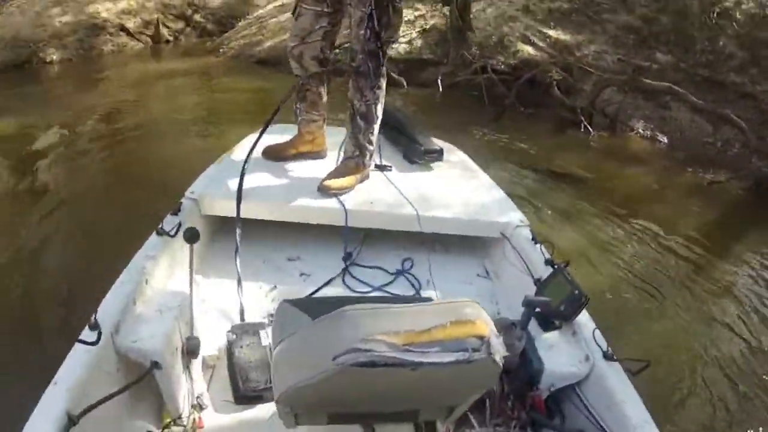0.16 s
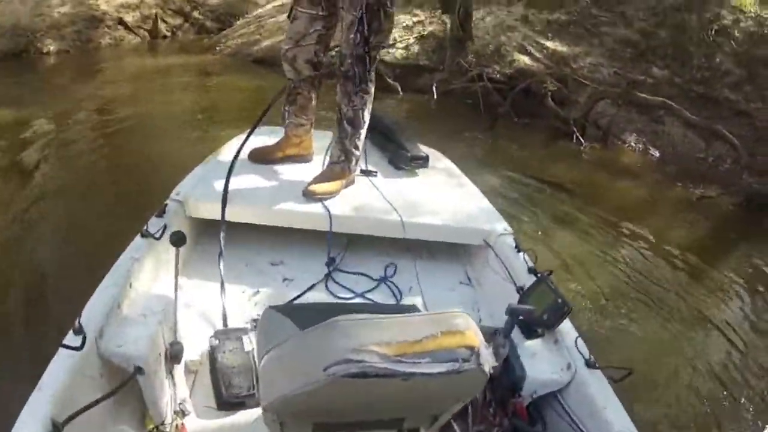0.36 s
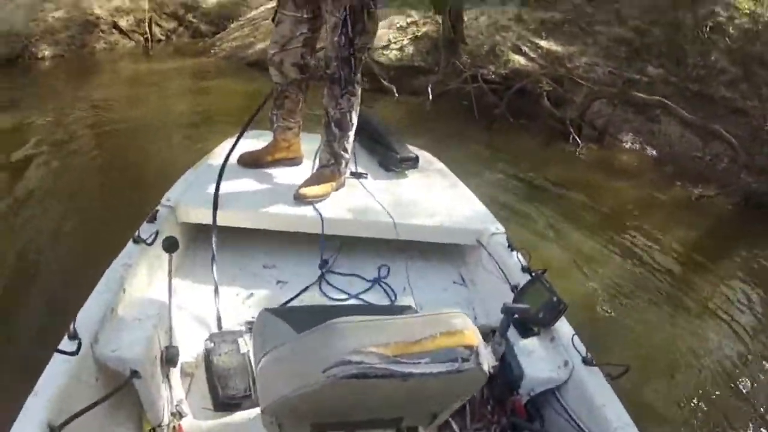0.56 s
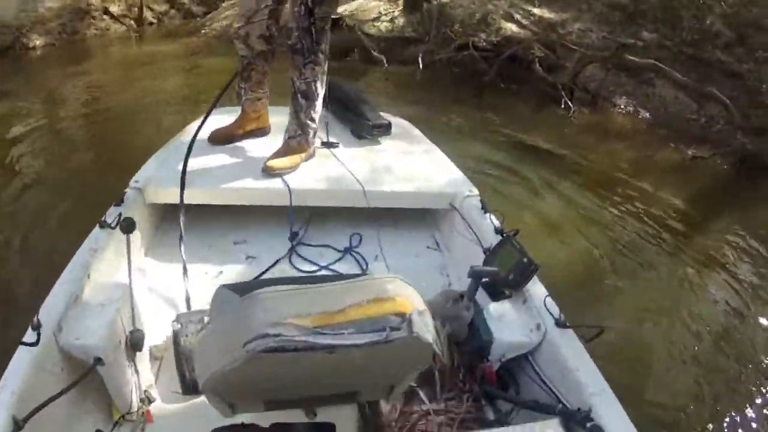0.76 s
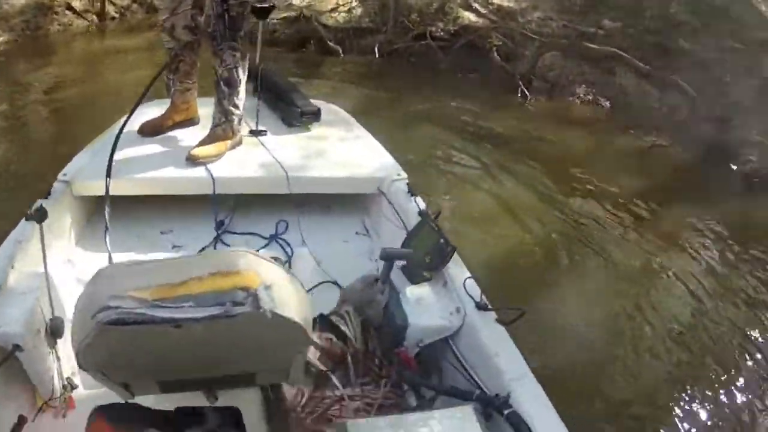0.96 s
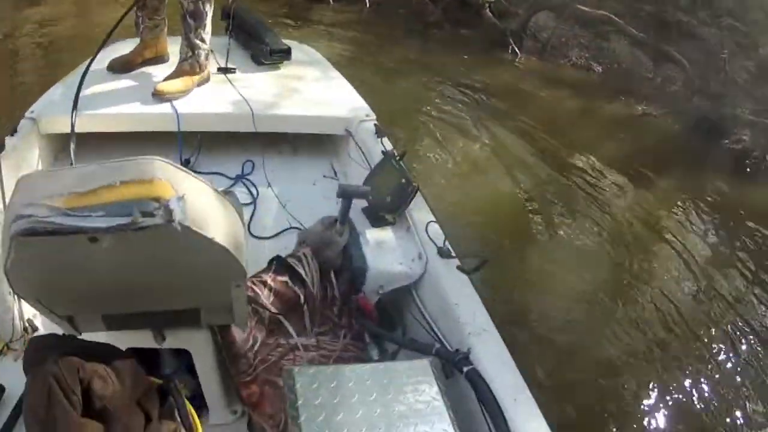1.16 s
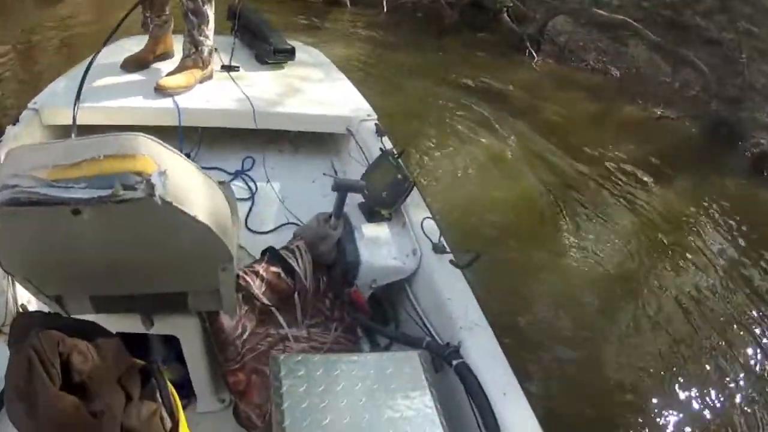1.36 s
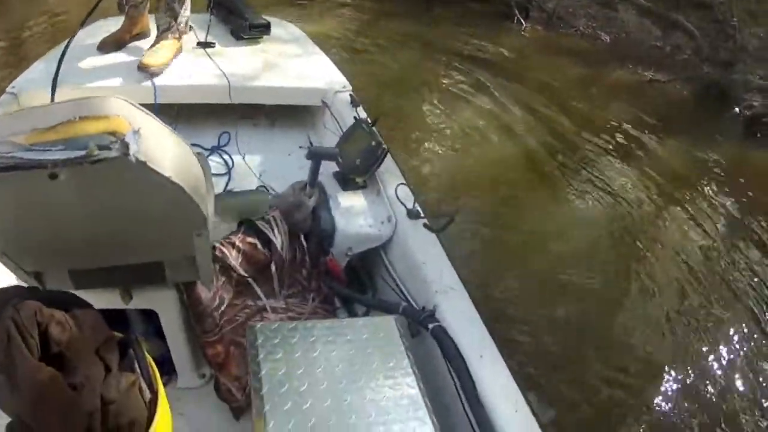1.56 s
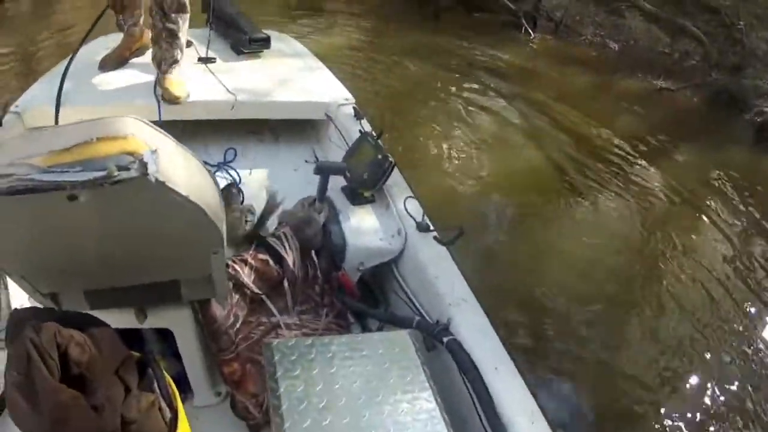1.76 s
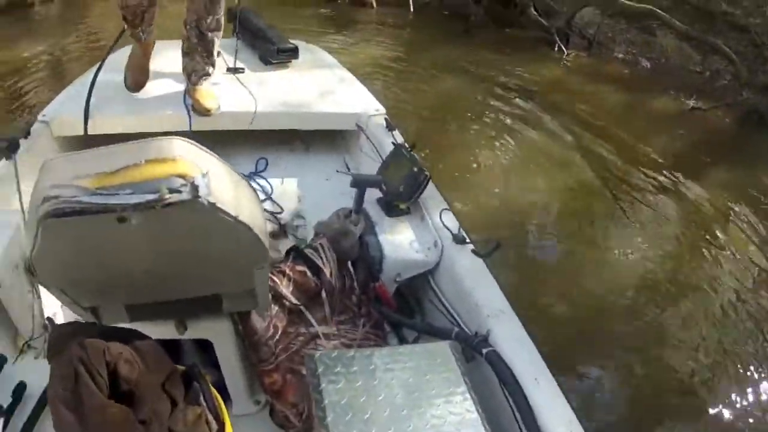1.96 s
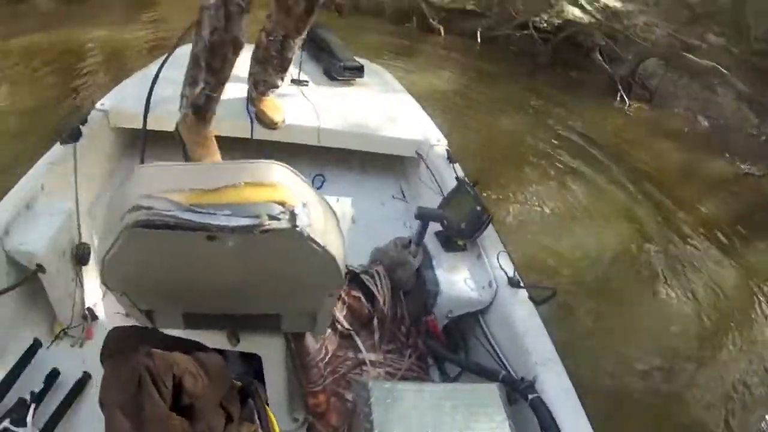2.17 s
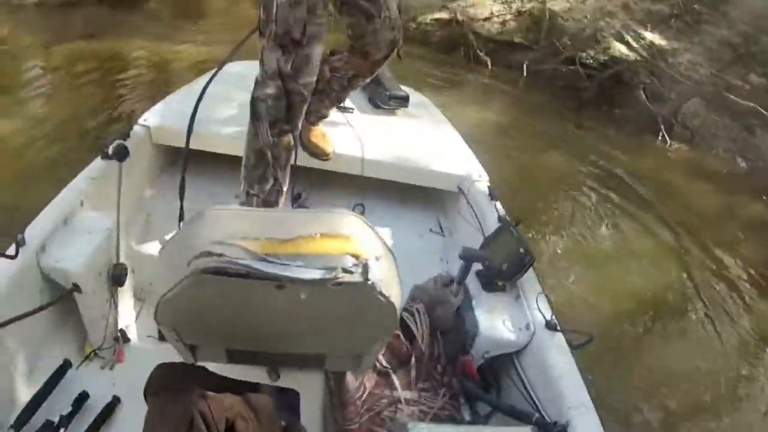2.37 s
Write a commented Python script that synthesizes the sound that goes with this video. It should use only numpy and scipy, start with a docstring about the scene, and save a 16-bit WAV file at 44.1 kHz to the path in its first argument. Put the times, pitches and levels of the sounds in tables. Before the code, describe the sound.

Close, muffled cloth rustle swells on a body-worn microphone, then returns in softer strokes amid clicks from its mount and dull bumps. A few hull knocks and a brief boot creak follow, over faint lapping on a quiet river.

```python
"""Clothing rubs over the plastic case of a body-worn camera, on a small boat on a quiet river.
As the wearer turns, tiny slips of the cloth rustle and rumble through the case. The camera's
mount sticks and slips with sharp ticks, and the case bumps dully against the body.
Feet and gear knock and scuff on the hull, a boot creaks, and water laps faintly against the boat."""
import sys
import numpy as np
from scipy import signal
from scipy.fft import rfft, irfft
from scipy.io import wavfile

SR = 44100
rng = np.random.default_rng(int(sys.argv[2]) if len(sys.argv) > 2 else 0)


def generate_wav(sig):
    """Save sig (samples, or channels by samples) to the path in sys.argv[1] as 16-bit PCM at SR."""
    pcm = np.round(np.clip(np.atleast_2d(sig).T, -1, 1) * 32767).astype(np.int16)
    wavfile.write(sys.argv[1], SR, pcm)


N = 105840
TIME = np.arange(N) / SR


def cloth_rubbing():
    """Each stroke swells and fades: fibres slip over the case in a dense rustle while it rumbles."""
    # strokes of cloth: loudest at t/s, rise/s, fall/s, rustle level/dB, rumble level/dB
    strokes = [(0.122, 0.11, 0.048, -40.5, -55), (.218, 0.037, 0.053, -29, -30),
               (0.264, 0.025, 0.025, -22, -27.5), (0.311, 0.082, 0.13, -28, -34.5),
               (0.426, 0.089, 0.12, -32, -36.5), (0.52, 0.025, 0.047, -35.5, -33),
               (0.571, 0.012, 0.015, -33.5, -29.5), (0.648, 0.046, 0.047, -38, -38),
               (0.705, 0.036, 0.039, -40.5, -40), (0.851, 0.0067, 0.042, -39, -48),
               (0.94, 0.029, 0.31, -45.5, -54), (1.127, 0.09, 0.094, -41.5, -43),
               (1.25, 0.11, 0.82, -45, -51), (1.377, 0.067, 0.082, -34, -37),
               (1.41, 0.027, 0.017, -32, -46), (1.495, 0.025, 0.023, -38.5, -38),
               (1.756, 0.023, 0.027, -41, -48), (1.84, 0.071, 0.18, -40, -49),
               (2.075, 0.089, 0.071, -36.5, -36), (2.104, 0.025, 0.022, -32, -31.5),
               (2.14, 0.033, 0.07, -38, -42), (2.254, 0.015, 0.028, -38.5, -39),
               (2.368, 0.017, 0.036, -42, -57)]
    # tone of the rustle, heard through the case: f/Hz, relative level/dB
    rustle_tone = [(200, -2), (350, -25.5), (480, -3.5), (580, -11), (930, -3.5), (1150, -10.5), (1500, -5),
                   (1820, 2.5), (2080, -0.5), (2350, 1.5), (2700, -6), (2980, -12.5), (3200, -2),
                   (3570, -2.5), (3760, -22), (4150, -19), (4550, -37.5), (5100, -18.5), (5900, -47.5)]
    # tone of the case's rumble: f/Hz, relative level/dB
    rumble_tone = [(20, -26.5), (55, 1.5), (90, 3), (140, -10.5), (195, 1.5), (260, -8), (380, -17),
                   (800, -53.5)]
    rustle_power, rumble_power = 0, 0
    for peak_s, rise, fall, rustle_db, rumble_db in strokes:
        from_peak = np.maximum((peak_s - TIME) / rise, (TIME - peak_s) / fall)
        shape_db = -20 * from_peak ** 1.5   # a rounded hill, 20 dB down one rise or fall from its top
        rustle_power += from_db(rustle_db + shape_db) ** 2
        rumble_power += from_db(rumble_db + shape_db) ** 2
    slips = tiny_slips(per_s=4500, spread_db=1.7)
    flutter = from_db(1.6 * drift(rate_hz=94))
    rustle = rms_one(slips * flutter) * np.sqrt(rustle_power)
    rumble = rng.standard_normal(N) * np.sqrt(rumble_power)
    return shape_tone(rustle, rustle_tone) + shape_tone(rumble, rumble_tone)


def mount_ticks():
    """Plastic sticks and slips: each snap chatters and rings at one pitch, then dies away in the case."""
    # ticks of the mount: t/s, relative level/dB, pitch f/Hz
    ticks = [(.099, -29.5, 1990), (.208, -22.5, 2340), (.225, -23, 2450), (0.24, -28, 2270),
             (0.567, -35, 2210), (.639, -32, 2310), (0.657, -42, 2300), (.707, -42, 2350),
             (0.725, -31.5, 2403), (.845, -37, 2630), (.867, -36.5, 2630), (.920, -42, 2450),
             (.934, -42, 2420), (0.953, -27.5, 2380), (.973, -40, 2480), (0.998, -37, 2360),
             (1.009, -39, 2330), (1.061, -31.5, 2410), (1.079, -40, 2380), (1.098, -34, 2380),
             (1.11, -26.5, 2310), (1.123, -28, 2630), (1.131, -28.5, 2380), (1.148, -33.5, 2420),
             (1.183, -37, 2380), (1.195, -39, 2330), (1.221, -43, 2330), (1.408, -27, 2400),
             (1.444, -39, 2640), (1.465, -34, 2440), (1.49, -30.5, 3340), (1.537, -37.5, 2760),
             (1.548, -36.5, 2300), (1.578, -37, 2600), (1.590, -39, 2480), (1.693, -36, 2180),
             (1.715, -47, 2730), (1.737, -34, 2515), (1.795, -35.5, 2300), (1.820, -22.5, 2544),
             (1.826, -24, 2370), (1.842, -31, 2400), (1.884, -40, 2500), (1.9024, -14.5, 2646),
             (1.902, -30.5, 3600), (1.91, -24, 2370), (1.918, -28, 2420), (2.127, -35, 2380),
             (2.16, -38, 2720), (2.181, -33, 2580), (2.196, -31.5, 2790), (2.364, -35, 2630)]
    # faint creaking between the ticks: t/s, relative level/dB
    creak_levels = [(0, -53.5), (.1, -39), (.45, -52), (.6, -50), (.9, -45.5), (.97, -39.5), (1.15, -37.5),
                    (1.3, -43), (1.5, -46), (1.9, -45), (2, -45), (2.2, -40.5), (2.31, -45.5), (2.4, -43)]
    # tone of the plastic: f/Hz, relative level/dB
    plastic_tone = [(150, -28), (500, -15.5), (850, -4), (1200, -1.5), (1800, 3.5), (2600, 6), (3050, -1),
                    (3550, 5.5), (3950, -8.5), (4500, -11.5), (5000, -4.5), (5900, -22)]
    ring_width_hz, tick_gain_db = 234, -25.5
    t, out = TIME[:SR // 5], np.zeros(N)
    swell = 1 - np.exp(-t / 0.0006)
    for start, db, hz in ticks:
        chatter, tail = rng.standard_normal((2, len(t))) * swell
        chatter = rms_one(chatter * fade(t, fade_s=0.036))
        push = rms_one(t == 0) + 0.46 * chatter   # one sharp click plus its chatter
        ring = resonance(resonance(push, hz, ring_width_hz), hz, ring_width_hz)
        snap = rms_one(ring) + from_db(-1.5) * chatter
        tail = tail * fade(t, fade_s=0.11)
        case_tail = rms_one(resonance(tail, hz, width_hz=380)) + from_db(7) * rms_one(tail)
        tick = rms_one(snap + from_db(-10.5) * case_tail)
        add(out, start, from_db(db + tick_gain_db) * tick)
    slips = tiny_slips(per_s=200, spread_db=0.5) * from_db(level_curve(creak_levels))
    creak = resonance(slips, hz=2474, width_hz=305)
    return shape_tone(out + creak, plastic_tone)


def case_bumps():
    """The case bumps against the body: each soft blow swells and dies within a few slow vibrations."""
    # dull bumps: t/s, peak level/dB, pitch f/Hz, swell time/s
    bumps = [(0.119, -34, 87, 0.025), (0.223, -16, 57.7, 0.024), (0.264, -16, 91.3, 0.015),
             (.232, -29, 165, 0.012), (.42, -26, 193.4, 0.015), (0.648, -32, 89.5, 0.016),
             (.66, -33, 199, 0.015), (0.783, -38, 47.7, 0.017), (1.046, -27.5, 83, 0.014),
             (1.355, -27.5, 88, 0.009), (1.409, -26.5, 101, 0.01), (1.482, -34.5, 101, 0.015),
             (1.641, -27, 93, 0.014), (1.645, -36.5, 209, 0.011), (1.916, -36.5, 200, 0.013),
             (2.083, -33.5, 68, 0.016), (2.098, -28, 181, .012), (2.302, -29, 79, 0.021)]
    t, out = TIME[:SR // 3], np.zeros(N)
    for start, db, hz, swell_s in bumps:
        loudness = (t / swell_s * np.exp(1 - t / swell_s)) ** 1.9
        add(out, start, from_db(db) * loudness * np.sin(2 * np.pi * hz * t))
    return out


def hull_knocks():
    """Each knock scuffs the hull and rings its natural notes, most of all those of the struck panel."""
    # feet and gear hitting the hull: t/s, relative ring level/dB, scuff level/dB, panel f/Hz
    knocks = [(.135, -38, -47, 696), (1.122, -32.5, -61, 749), (1.153, -37.5, -65, 790),
              (1.629, -33, -33, 790), (1.6535, -36, -31, 662), (1.690, -49, -38, 905),
              (1.745, -37.5, -44, 820), (1.824, -32.5, -46, 850), (2.098, -36, -47, 460),
              (2.244, -39, -61, 735)]
    # the hull's natural notes: f/Hz, relative level/dB, time to fade by 60 dB/s
    hull_notes = [(460, -0.5, 0.12), (662, -2, 0.19), (735, 1.5, 0.085), (790, -8, 0.068),
                  (850, -5.5, 0.091), (926, -15, 0.12), (944, 0, 0.24)]
    # tone of the gritty scuff: f/Hz, relative level/dB
    scuff_tone = [(200, -5), (450, 3), (800, 7), (1150, 8), (1600, -1.5), (2200, 8.5), (2900, -12),
                  (3500, -23), (3900, -4), (4250, -9.5), (4800, -10), (5250, -0.5), (5600, -17),
                  (5950, -23)]
    panel_width_hz, other_notes_db = 36, -13.5
    t, rings, scuffs = TIME[:SR // 3], np.zeros(N), np.zeros(N)
    for start, db, scuff_db, panel_hz in knocks:
        for hz, note_db, fade_s in hull_notes:
            near_panel = np.exp(-((hz - panel_hz) / panel_width_hz) ** 2)
            strength = (from_db(other_notes_db) + near_panel) * from_db(db + note_db)
            note = rng.choice([-1, 1]) * np.sin(2 * np.pi * hz * t)
            add(rings, start, strength * fade(t, fade_s) * note)
        grit = rng.standard_normal(len(t)) + 9 * (t == 0)   # noise that opens with a click
        add(scuffs, start, from_db(scuff_db) * fade(t, fade_s=0.05) * grit)
    return rings + shape_tone(scuffs, scuff_tone)


def boot_creak():
    """A sole sticks and slips on the deck in a quick, uneven run, and every slip rings briefly."""
    # strength of the slips: t/s, relative level/dB
    slip_levels = [(1.630, -41), (1.648, -38), (1.66, -38), (1.68, -40.5), (1.70, -36.5), (1.724, -52)]
    # notes that ring in the creak: f/Hz, width/Hz, relative level/dB
    creak_notes = [(464, 20, 3), (644, 22, -5), (770, 24, 5), (930, 32, 2), (1134, 57, -2), (1540, 82, 3.5),
                   (1860, 130, -3), (2380, 31, -4), (3610, 89, -7), (4230, 70, -12), (5210, 75, -5.5)]
    slips_per_s, gap_spread, uneven_db, gain_db = 134, 0.14, 3.5, 35.5
    times, levels_db = np.transpose(slip_levels)
    gap_jitter, level_jitter = rng.standard_normal((2, 16))
    slip_times = times[0] + np.cumsum(1 + gap_spread * gap_jitter) / slips_per_s
    strengths = from_db(np.interp(slip_times, times, levels_db) + uneven_db * level_jitter)
    slips, out = np.zeros(N), np.zeros(N)
    slips[(slip_times * SR).astype(int)] = strengths * (slip_times < times[-1])
    for k, (hz, width_hz, db) in enumerate(creak_notes):
        out += (-1) ** k * from_db(db) * resonance(slips, hz, width_hz)   # every other note is flipped
    return from_db(gain_db) * out


def bright_bursts():
    """Bright, gritty bursts: the sharp edge of the mount's ticks, and short scuffs between them."""
    # bursts of noise: t/s, level/dB, time to fade by 60 dB/s
    bursts = [(.098, -39, 0.045), (.207, -38.5, 0.033), (.224, -36, 0.034), (.405, -44.5, 0.17),
              (.844, -46, 0.07), (.920, -50, .11), (.952, -40, .035), (1.120, -29, 0.078),
              (1.128, -36, 0.042), (1.518, -46, .025), (1.551, -52, .07), (1.903, -29.5, 0.034),
              (2.018, -50, 0.12), (2.241, -44, 0.12)]
    # tone of the bursts: f/Hz, relative level/dB
    burst_tone = [(300, -10.5), (750, 3.5), (1300, -16), (2500, -1), (3500, 5), (4200, -15), (5000, -2),
                  (5900, -11.5)]
    t, out = TIME[:SR // 5], np.zeros(N)
    for start, db, fade_s in bursts:
        add(out, start, from_db(db) * fade(t, fade_s) * rng.standard_normal(len(t)))
    return shape_tone(out, burst_tone)


def squeak():
    """One tiny, rough squeak that falls in pitch."""
    start_s, length_s, glide_s = 1.041, 0.013, 0.0065
    from_hz, towards_hz = 5700, 3100
    progress = np.clip((TIME - start_s) / length_s, 0, 1)
    glide_hz = towards_hz + (from_hz - towards_hz) * np.exp(-progress * length_s / glide_s)
    rough_hz = glide_hz * (1 + 0.16 * drift(rate_hz=378))
    loudness = from_db(-46) * np.sqrt(4 * progress * (1 - progress))
    return loudness * np.sin(2 * np.pi * np.cumsum(rough_hz) / SR)


def water():
    """A low wash against the hull swells with the ripples, over the faint, steady hiss of the river."""
    # rise and fall of the wash: t/s, level/dB
    wash_levels = [(0, -51.5), (.1, -48.5), (.3, -42.5), (.7, -41.5), (.9, -43.5), (1.15, -48.5),
                   (1.32, -39), (1.5, -47), (1.58, -53.5), (1.72, -44), (1.87, -49), (1.94, -45),
                   (2.0, -58), (2.17, -41), (2.27, -42), (2.4, -43.5)]
    # tone of water against the hull: f/Hz, relative level/dB
    wash_tone = [(20, 0.5), (50, 3.5), (100, 5.5), (140, -1), (200, 1), (350, -14.5), (700, -23),
                 (1300, -36), (3500, -37.5)]
    # tone of the river's hiss: f/Hz, relative level/dB
    river_tone = [(100, 9.5), (700, -8), (1300, -9), (2300, 3), (3500, -10.5), (4500, -18), (5900, -23)]
    noise = rng.standard_normal(N)
    ripples_db = 1.5 * drift(rate_hz=6)
    wash = shape_tone(noise * from_db(level_curve(wash_levels) + ripples_db), wash_tone)
    hiss = from_db(-50.5) * shape_tone(rng.standard_normal(N), river_tone)
    return wash + hiss


def from_db(db):
    """Turn decibels into a number to multiply by."""
    return 10 ** (np.asarray(db) / 20)


def rms_one(x):
    """Scale a sound so that its average size (root mean square) is 1."""
    return x / np.sqrt(np.mean(x ** 2) + 1e-20)


def add(out, start_s, x):
    """Mix the sound x into out, beginning at start_s."""
    i = max(int(start_s * SR), 0)
    out[i:i + len(x)] += x[:max(N - i, 0)]


def level_curve(points):
    """Join (time, level) points with straight lines, one value for each sample."""
    return np.interp(TIME, *np.transpose(points))


def fade(t, fade_s):
    """Die away from 1, losing 60 dB every fade_s seconds."""
    return np.exp(-np.log(1000) * t / fade_s)


def drift(rate_hz):
    """Smooth random wandering of typical size 1; a higher rate wanders faster."""
    r = np.exp(-2 * np.pi * rate_hz / SR)
    return rms_one(signal.lfilter([1], [1, -2 * r, r * r], rng.standard_normal(N + SR))[SR:])


def tiny_slips(per_s, spread_db):
    """Tiny clicks of uneven size at random moments, as when one surface catches on another."""
    sizes = from_db(spread_db * np.minimum(rng.exponential(1, N), 4)) * rng.choice([-1, 1], N)
    return rms_one(sizes * (rng.random(N) < per_s / SR))


def resonance(x, hz, width_hz):
    """Make x ring at one pitch; a narrower width rings longer."""
    r = np.exp(-np.pi * width_hz / SR)
    feedback = [1, -2 * r * np.cos(2 * np.pi * hz / SR), r * r]
    return signal.lfilter(np.array([1, 0, -1]) * (1 - r * r) / 2, feedback, x + 1e-18)


def shape_tone(x, tone):
    """Filter x by (f/Hz, level/dB) points and cut the high treble; white noise keeps its level."""
    size, top_hz = 2 ** 17, 6500
    hz, db = np.transpose(tone)
    grid_hz = np.arange(size // 2 + 1) * SR / size + 1
    top_cut = 1 / (1 + (grid_hz / top_hz) ** 20)
    gain = rms_one(from_db(np.interp(np.log(grid_hz), np.log(hz), db)) * top_cut)
    # these steps make the filter ring only after a sound, never before it
    cepstrum = irfft(np.log(gain + 1e-6))
    cepstrum[1:size // 2] *= 2
    cepstrum[size // 2 + 1:] = 0
    return irfft(rfft(x, size) * np.exp(rfft(cepstrum)))[:len(x)]


def scene():
    """All the sounds add up at the one microphone."""
    mix = water() + cloth_rubbing() + mount_ticks() + case_bumps()
    mix += hull_knocks() + boot_creak() + bright_bursts() + squeak()
    return mix[None]


def record(dry):
    """The camera samples slowly and holds each value, mirroring sound into the treble; the top is cut."""
    camera_rate_hz, top_hz = 12000, 15250
    slow = signal.resample_poly(dry, camera_rate_hz, SR, axis=1)
    held = np.repeat(slow, 4, axis=1)
    full_rate = signal.resample_poly(held, SR, 4 * camera_rate_hz, axis=1)[:, :N]
    top_cut = signal.ellip(10, 0.3, 70, top_hz, fs=SR, output="sos")
    return signal.sosfilt(top_cut, full_rate)


dry = scene()
out = record(dry)
generate_wav(out)
```